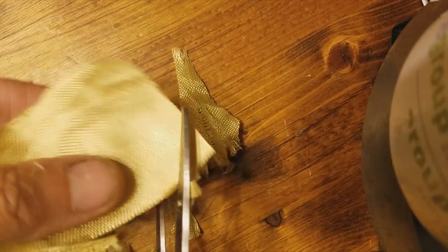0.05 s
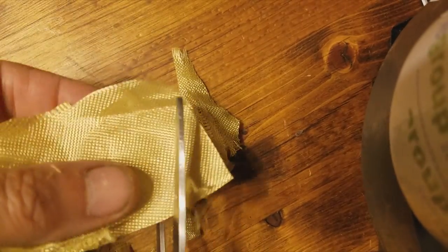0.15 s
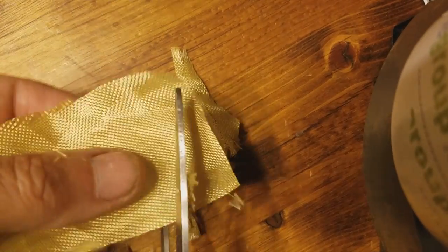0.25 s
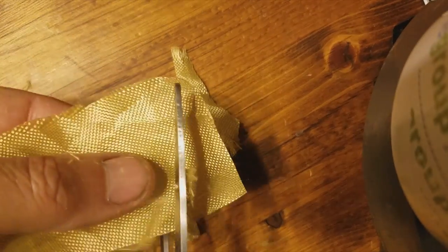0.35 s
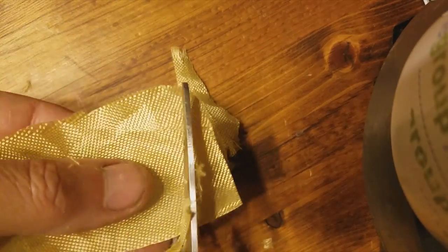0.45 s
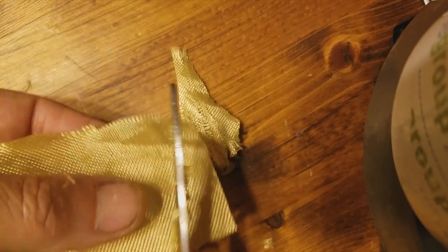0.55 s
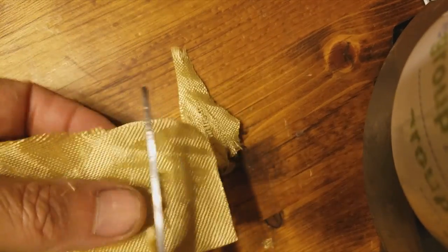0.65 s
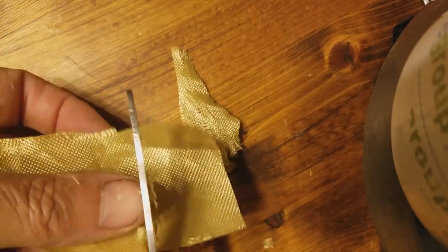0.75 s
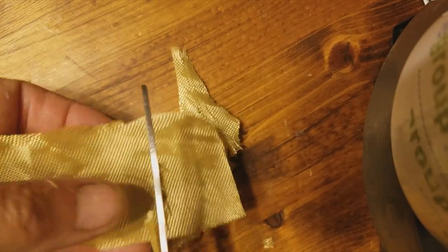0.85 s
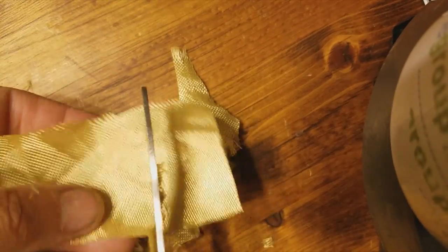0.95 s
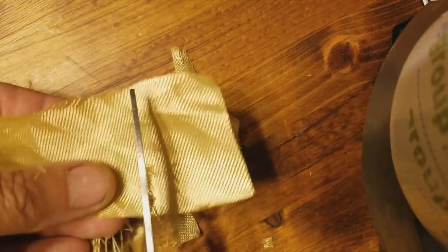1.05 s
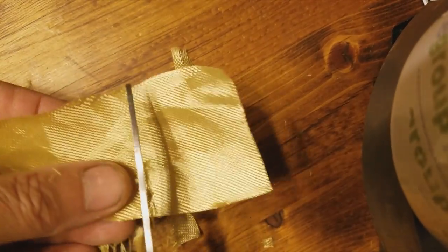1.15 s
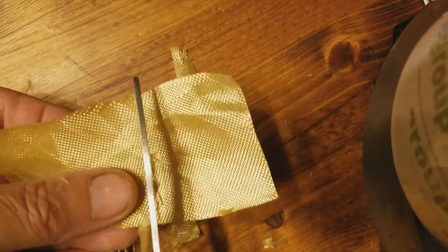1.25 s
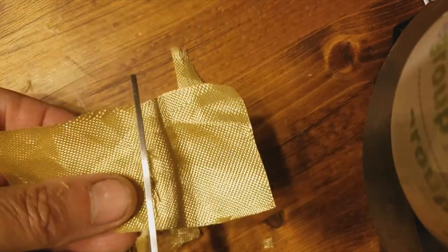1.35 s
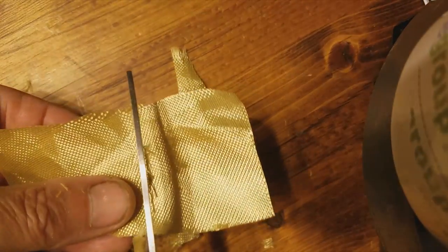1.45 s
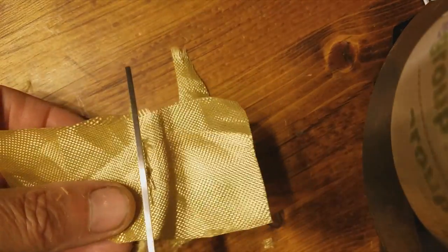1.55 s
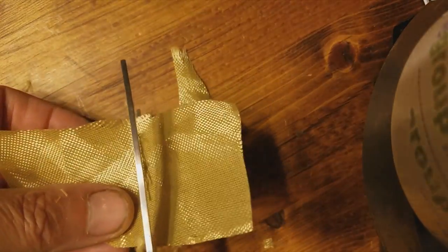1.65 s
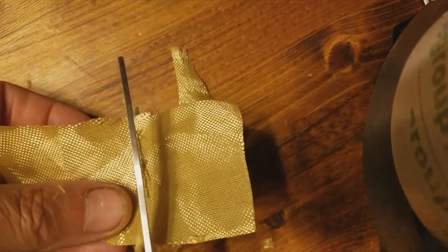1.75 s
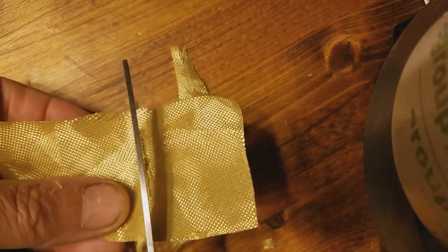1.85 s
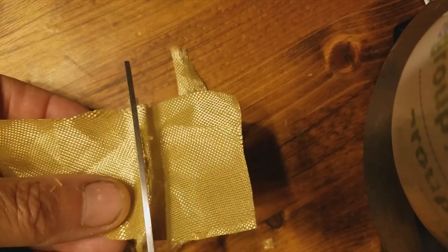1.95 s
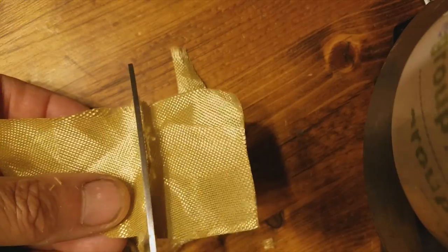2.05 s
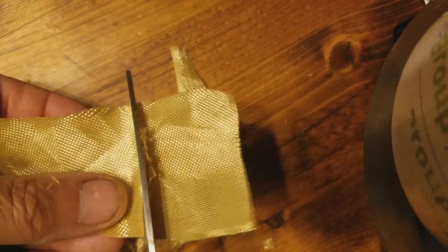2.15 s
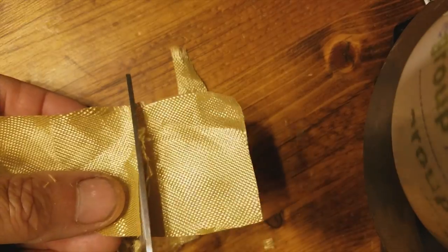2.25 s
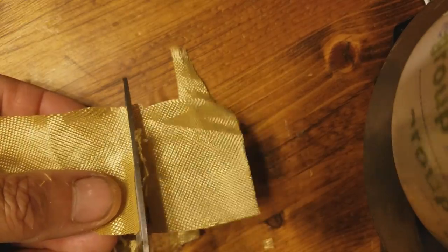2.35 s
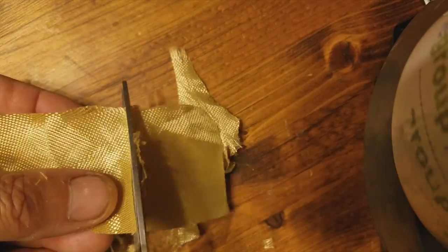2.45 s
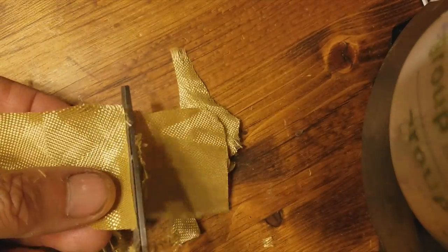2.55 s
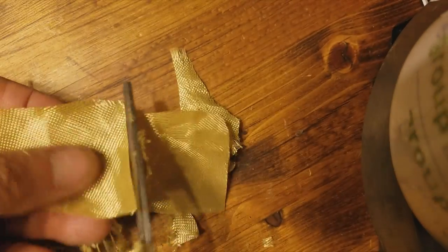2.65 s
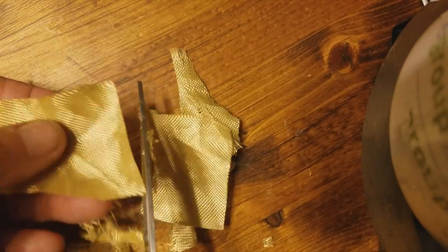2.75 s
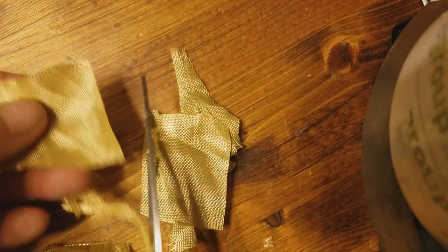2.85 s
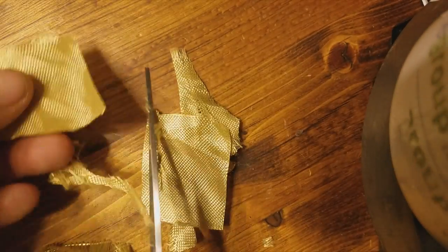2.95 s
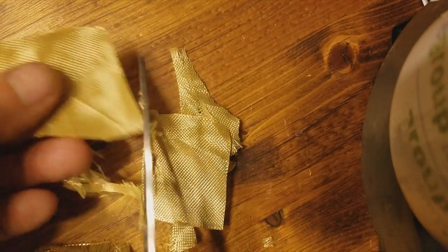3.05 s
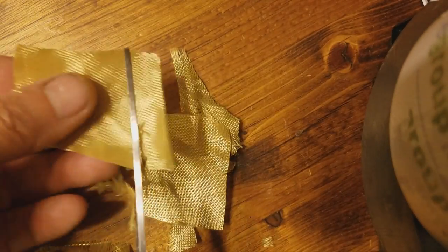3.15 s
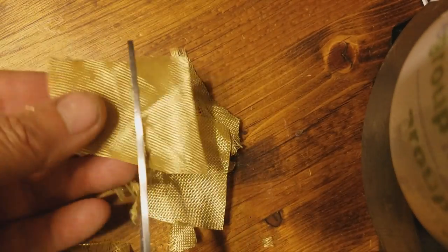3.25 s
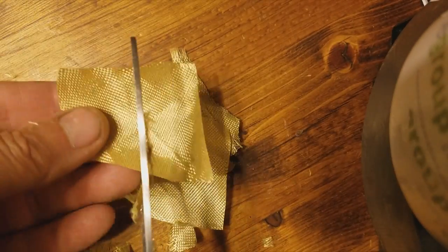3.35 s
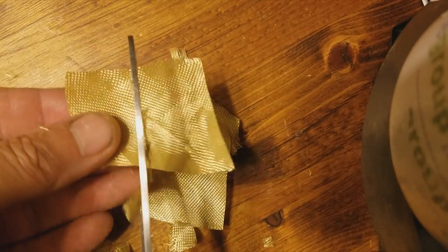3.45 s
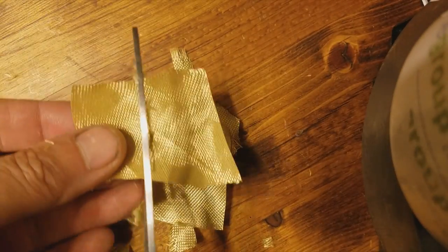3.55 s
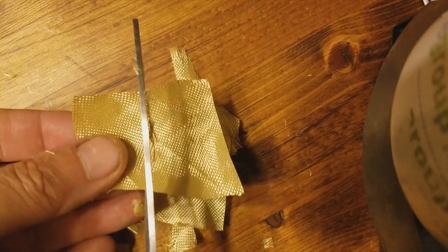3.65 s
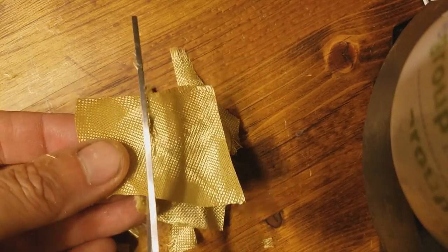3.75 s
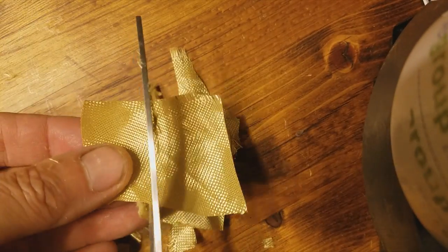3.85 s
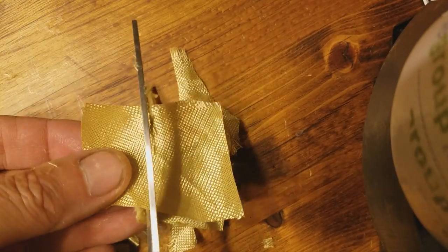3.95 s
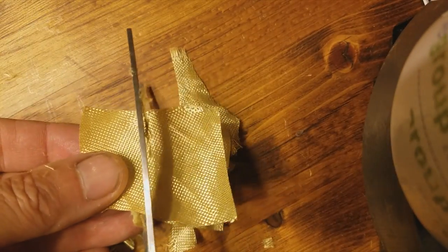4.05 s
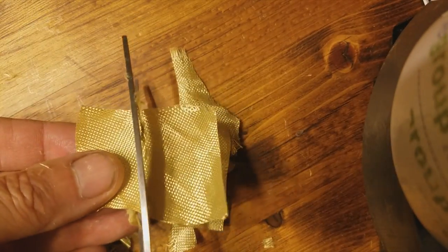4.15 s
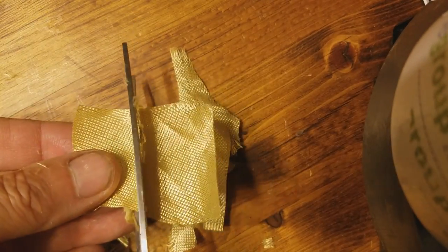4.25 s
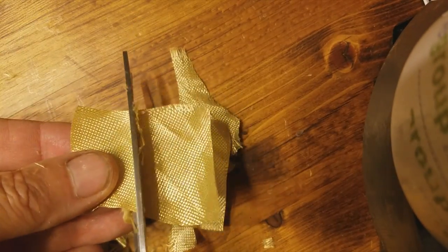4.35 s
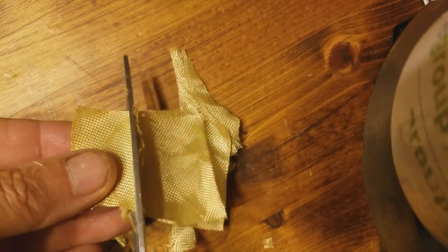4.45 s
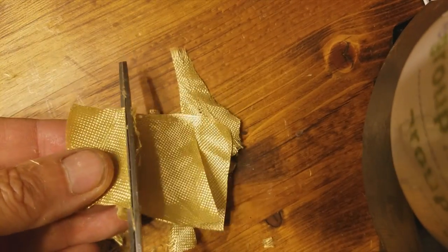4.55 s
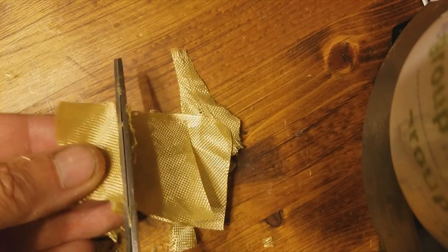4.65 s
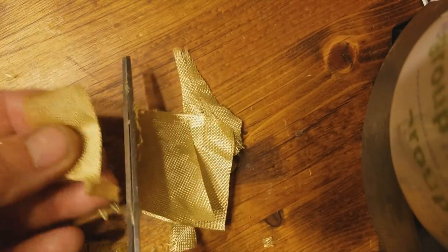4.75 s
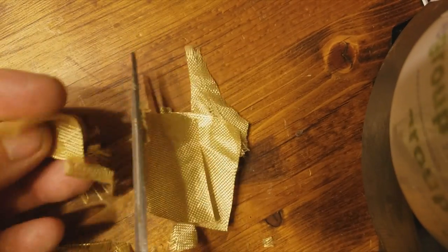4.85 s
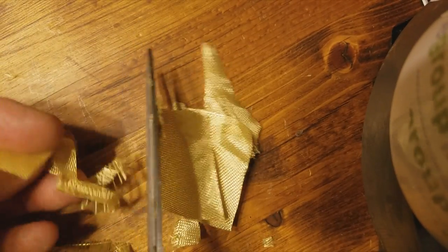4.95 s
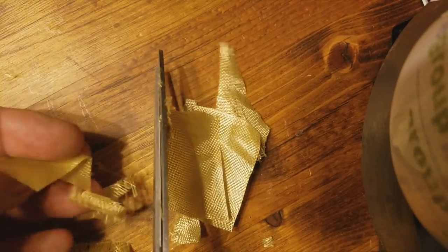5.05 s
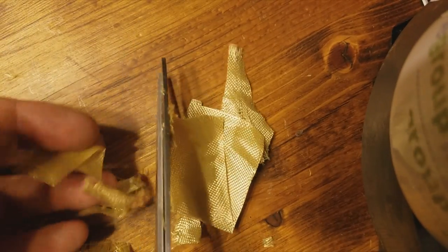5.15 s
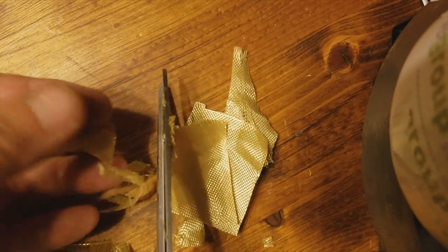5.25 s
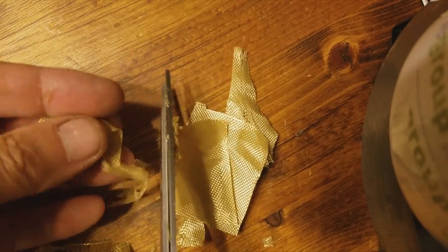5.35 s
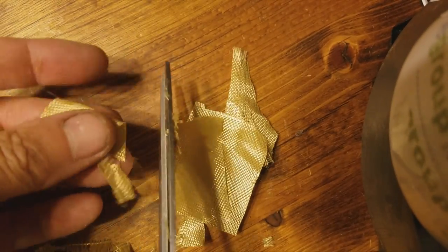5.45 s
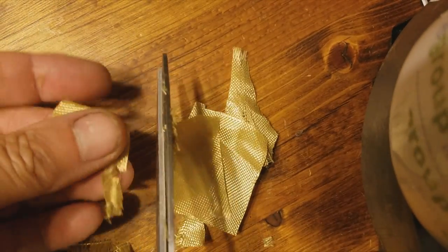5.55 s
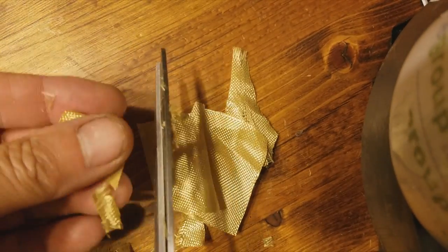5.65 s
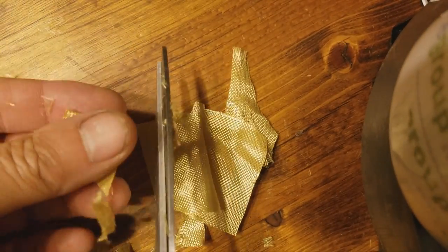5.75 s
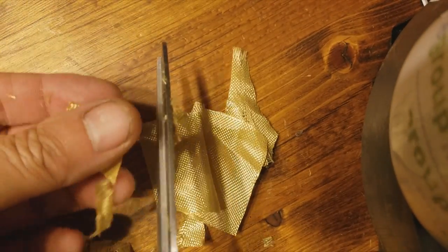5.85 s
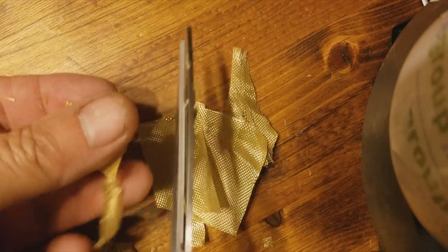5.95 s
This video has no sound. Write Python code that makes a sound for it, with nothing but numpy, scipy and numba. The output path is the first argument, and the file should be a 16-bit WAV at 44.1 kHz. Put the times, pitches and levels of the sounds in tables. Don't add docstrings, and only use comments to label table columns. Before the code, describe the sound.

Serrated scissors crunch slowly through stiff woven cloth in two ratcheting cuts, each ending in a sharp snap and a metallic click on reopening.

```python
import sys
import numpy as np
from scipy import signal
from scipy.fft import rfft, irfft
from scipy.io import wavfile
from scipy.ndimage import uniform_filter1d
from numba import njit

SR = 44100
rng = np.random.default_rng(int(sys.argv[2]) if len(sys.argv) > 2 else 0)


def wav_out(sig):
    wavfile.write(sys.argv[1], SR, np.round(np.clip(np.atleast_2d(sig).T, -1, 1) * 32767).astype(np.int16))


def gain_from_db(level_db):
    decades = np.asarray(level_db, float) / 20
    return 10 ** decades


N = 264820

# f/Hz, density/dB
ROOM_SPECTRUM = [(28, -6.5), (370, -10.5), (520, -15), (2600, -21), (7600, -30.5), (8870, -33),
                 (13700, -27.5), (16000, -30)]
# f/Hz, width/Hz, level/dB
HUM_MODES = [(106, 30, -71.5)]
# t/s, peak/dB, first f/Hz, last f/Hz, t60/s
TABLE_BLOWS = [(.005, -38.5, 550, 118, 0.076), (0.023, -50, 910, 200, 0.014), (.044, -48, 915, 300, 0.0092),
               (.048, -47.5, 690, 200, 0.018), (0.1158, -38, 540, 122, 0.065),
               (0.133, -49, 880, 201, 0.033), (0.224, -53.5, 510, 150, 0.084),
               (0.362, -42, 544, 114, 0.081), (.391, -51, 910, 306, 0.024), (.583, -47, 400, 131, 0.073),
               (0.647, -52.5, 594, 200, 0.082), (0.991, -55, 300, 110, 0.054),
               (2.487, -40, 231, 156, 0.054), (2.734, -59, 1090, 600, 0.015), (4.8, -45, 1080, 600, 0.023),
               (4.512, -40.5, 350, 86, 0.053)]
# t/s, peak/dB, f/Hz
FIBRE_TICKS = [(0.044, -50, 2120), (0.06, -44, 3600), (0.0694, -45, 2630), (0.392, -38.5, 7650),
               (0.6496, -39, 6840), (0.9333, -41, 7460), (1.4154, -55, 6900), (1.439, -59, 2120),
               (1.5274, -39, 2200), (1.5664, -53, 2960), (1.6084, -35, 3040), (1.6283, -33.5, 2400),
               (3.7494, -75, 2770), (5.114, -40, 5880), (5.1258, -36.5, 2810), (5.9506, -39, 7150)]
# middle t/s, length/s, level/dB, treble/dB
CLOTH_SWELLS = [(0.018, 0.24, -62, -5), (0.264, 0.072, -67.5, 0), (.345, .04, -72, 2),
                (0.527, 0.041, -68, -3.5), (.77, .36, -70.5, -3.5), (0.966, 0.022, -65, -11),
                (1.014, 0.1, -64.5, 2), (1.43, 0.053, -63.5, -8), (1.47, 0.026, -54, -8),
                (1.526, 0.088, -56, -6), (1.599, 0.11, -58.5, -1.5), (1.84, 0.051, -62.5, -5),
                (2.678, 0.17, -65.5, -1), (2.96, .2, -65.5, 0), (3.16, 0.29, -65.5, -1.5),
                (3.43, 0.15, -70.5, 0), (3.746, 0.028, -63.5, -1.5), (3.81, 0.094, -65.5, -5),
                (4.06, 0.045, -69, -6), (4.652, 0.056, -67.5, -2.5), (4.746, 0.12, -67.5, -5),
                (4.856, 0.15, -66, 0.5), (5.006, 0.087, -71.5, 7.5), (5.135, 0.041, -68.5, 8.5),
                (5.253, 0.31, -73, 2), (5.399, 0.034, -62, -0.5), (5.508, .12, -68, 2.5),
                (5.66, 0.2, -74, 5.5)]
# middle t/s, length/s, level/dB, treble/dB
GRIND_SWELLS = [(1.98, .16, -71, 5), (2.25, 0.48, -63, -3), (2.51, 0.047, -58, -6.5),
                (2.77, 0.058, -59, -5), (4.161, 0.072, -60.5, 4), (4.32, 0.23, -65.5, 1.5),
                (4.53, 0.099, -58.5, -9), (4.81, .06, -58.5, -9)]
# f/Hz, width/Hz, level/dB
WEAVE_MODES = [(7450, 1150, 3.5), (5730, 4200, -4), (11070, 3300, -0.5), (14300, 4700, -2.5)]
# t/s, level/dB
HAND_EFFORT = [
    [(1.93, -70), (2.018, -60), (2.168, -62.5), (2.246, -55), (2.414, -70.5), (2.49, -54), (2.56, -81)],
    [(4.09, -78), (4.214, -60.5), (4.306, -70.5), (4.382, -57), (4.478, -67), (4.516, -61), (4.58, -83)],
]
# f/Hz, width/Hz, level/dB
BLADE_MODES = [(3860, 670, 4), (5660, 870, -18), (7000, 820, 7), (6100, 9000, -4.5)]
# f/Hz, width/Hz, level/dB
FIBRE_MODES = [(10000, 1500, 4.5), (12200, 1700, 5), (13470, 2400, 3), (14950, 1500, 3)]
# f/Hz, level/dB, t60/s
STEEL_MODES = [(3320, 0, .03), (5740, -6, .025), (7000, -9, .025)]
# t/s, length/ms, force level/dB, steel over cloth/dB
FIRST_YARNS = [(1.921, 12.4, -62, 3.5), (1.946, 3.9, -52, -4), (1.953, 5.1, -52, 1), (1.955, 18, -70.5, 12),
               (1.995, 17.4, -52.5, 5), (2.024, 11.2, -45, -2), (2.034, 12, -60.5, 8),
               (2.063, 14, -45.5, -3), (2.091, 9.6, -45.5, -2), (2.107, 5.3, -54, 7.5),
               (2.144, 2.9, -71, 5), (2.155, 10.2, -39, -4), (2.187, 13.9, -40.5, -10),
               (2.215, 4.4, -70, 14), (2.232, 13.6, -41, -4), (2.256, 10.4, -37, -6.5),
               (2.289, 10.8, -38, -3), (2.328, 4.1, -58, 3), (2.345, 9.9, -32.5, -8), (2.37, 5.2, -40, -6),
               (2.384, 2.9, -48, -3), (2.389, 4.5, -41.5, -2), (2.424, 2.8, -44, -6), (2.43, 13, -32, -4.5),
               (2.463, 6, -39, -2.5), (2.476, 2.5, -57, 14)]
# t/s, length/ms, force level/dB, steel over cloth/dB
SECOND_YARNS = [(4.109, 12, -58.5, -4), (4.121, 9.2, -58, -7), (4.129, 10, -64, 6), (4.149, 18, -58, -2),
                (4.167, 5.4, -45.5, -8), (4.174, 10, -59, 9), (4.195, 20.3, -48.5, 2.5),
                (4.22, 17.8, -47, 0), (4.256, 17, -46.5, -0.5), (4.287, 10.3, -50, 3),
                (4.313, 16.6, -41, -4), (4.342, 16, -41, -4), (4.367, 16, -42.5, -0.5),
                (4.389, 10.5, -38.5, -5), (4.413, 7.7, -55, 7), (4.419, 8, -37, -4.5), (4.44, 3.7, -54, 0),
                (4.453, 10.5, -37.5, -0.5), (4.489, 4.2, -37, -2)]
CUT_LEANS = (2, 4.5)
# t/s, length/ms, force level/dB, steel over cloth/dB, fibre over blade/dB
BLADE_SHUTS = [(2.481, 3.4, -30, -3.5, -13), (2.486, 5.7, -33.5, 7.5, -3), (2.493, 1.9, -26.5, 2.5, 2.5),
               (2.496, 16, -52, -6, 1), (4.513, 4.3, -44, 2, -15), (4.514, 9.9, -35.5, 7.5, -3),
               (4.528, 25, -52.5, 1.5, -2)]
# t/s, length/ms, force level/dB, steel over cloth/dB, fibre over blade/dB
BLADE_OPENS = [(2.726, 10, -38, 1.5, -2), (2.7327, 2.83, -28, 5.5, -8), (2.7363, 2.5, -31, 4, -11.5),
               (2.74, 3, -31, -1, -9.5), (2.745, 8.6, -45, -11, -4), (2.76, 15, -62, -3, 1),
               (2.773, 18, -56, -5.5, -2), (4.791, 4.1, -51, -3, 0), (4.795, 10, -41, 15, -6),
               (4.801, 2, -44, 7, 0), (4.805, 3.5, -27, -4, -7), (4.811, 3.3, -43, -10, 4)]
# t/s, f/Hz
SPAN_PITCH = [
    [(1.92, 1900), (2.0, 1940), (2.065, 1140), (2.19, 1060), (2.33, 1520), (2.39, 1750), (2.43, 2500),
     (2.486, 2900), (2.5, 2170)],
    [(2.728, 2840), (2.74, 2760), (2.76, 1500), (2.8, 1500)],
    [(4.11, 950), (4.2, 1490), (4.26, 1300), (4.39, 1250), (4.42, 1830), (4.49, 1700), (4.514, 2940),
     (4.53, 2580)],
    [(4.79, 2200), (4.804, 3200), (4.812, 1530)],
]
# start t/s, end t/s, first f/Hz, last f/Hz, share level/dB
TIP_GLIDES = [(1.937, 2.04, 7000, 7600, 0.5), (2.05, 2.157, 8400, 11500, -3),
              (2.17, 2.253, 11400, 14300, 6.5), (2.245, 2.29, 14300, 15400, -2),
              (2.758, 2.786, 15100, 10600, 0), (4.1, 4.188, 15500, 13200, 3),
              (4.188, 4.24, 7100, 7750, -0.5), (4.246, 4.304, 8550, 10100, -5),
              (4.31, 4.405, 10100, 15500, -0.5), (1.94, 2.05, 9000, 8800, -7),
              (4.118, 4.18, 8900, 8900, -6), (4.323, 4.42, 10100, 10300, -2)]


def unit(x):
    return x / np.sqrt(np.mean(x ** 2))


@njit
def svf(x, hz, width):
    y, b, l = np.empty(len(x)), 0., 0.
    for i in range(len(x)):
        g, k = np.tan(np.pi * hz[i] / SR), width / hz[i]
        v = (b + g * (x[i] - l)) / (1 + g * (g + k))
        b, l, y[i] = 2 * v - b, l + 2 * g * v, k * v
    return y


def body(x, modes):
    out = np.zeros(N)
    for k, (hz, width, db) in enumerate(modes):
        out += (-1) ** k * gain_from_db(db) * svf(x, np.full(N, 1. * hz), 1. * width)
    return out


def band(x, lo_hz, hi_hz, order=2):
    return signal.sosfilt(signal.butter(order, [lo_hz, hi_hz], "band", fs=SR, output="sos"), x)


def held(t, start, end, fade_s):
    return np.clip(1 + np.minimum(t - start, end - t) / fade_s, 0, 1)


def walk(rate):
    k = int(SR / rate)
    return uniform_filter1d(np.repeat(rng.standard_normal(N // k + 1), k), k)[:N]


def snaps(per_s, spread_db):
    hit = rng.random(N) < per_s / SR
    loudness = gain_from_db(spread_db * np.minimum(rng.exponential(size=N), 4))
    return unit(hit * rng.standard_normal(N) * loudness)


def voices(excite, cloth_hz, cloth_width, blade_modes, fibre_modes):
    def cloth(x):
        return band(svf(x, cloth_hz, cloth_width) + 0.27 * x, 590, 3130)

    def blade(x):
        return band(body(x, blade_modes), 2840, 8300)

    def fibre(x):
        return band(body(x, fibre_modes), 12100, 18900)

    return [lambda x, f=f: f(x) / np.sqrt(np.mean(f(excite) ** 2)) for f in (cloth, blade, fibre)]


def room_tone():
    hz, db = np.transpose(ROOM_SPECTRUM)
    f = np.maximum(np.arange(N // 2 + 1) * SR / N, 1)
    colour = gain_from_db(np.interp(np.log(f), np.log(hz), db))
    air = unit(irfft(rfft(rng.standard_normal(N)) * colour, N))
    hum = sum(gain_from_db(db) * unit(body(rng.standard_normal(N), [(hz, width, 0)])) for hz, width, db in HUM_MODES)
    whine_hz = 743 + 2 * walk(3)
    whine = np.sqrt(2) * np.sin(2 * np.pi * np.cumsum(whine_hz) / SR)
    return gain_from_db(-62.5 + 0.3 * walk(4.5)) * air + hum + gain_from_db(-77) * whine


def thuds():
    out, t = np.zeros(N + 8192), np.arange(8192) / SR
    for s, db, first_hz, last_hz, t60 in TABLE_BLOWS:
        hz = last_hz + (first_hz - last_hz) * np.exp(-t / 0.0028)
        phase = 2 * np.pi * np.cumsum(hz) / SR
        decay = gain_from_db(db - 60 * t / t60) * (1 + 0.81 * np.exp(-t / 0.00033))
        start = int(s * SR)
        out[start:start + 8192] -= decay * np.sin(phase + 0.33 * np.sin(phase))
    return out[:N]


def ticks():
    out, t = np.zeros(N + 512), np.arange(512) / SR
    for s, db, hz in FIBRE_TICKS:
        tone = np.sin(2 * np.pi * hz * t) * np.exp(-t / .0002)
        noise = .5 * rng.standard_normal(512) * np.exp(-t / .0006)
        start = int(s * SR)
        out[start:start + 512] += gain_from_db(db - 3) * (tone + noise)
    return out[:N] - svf(out[:N], np.full(N, 9200.), 2500.)


def rustle():
    t, power = np.arange(N) / SR, np.zeros((3, N))
    skirt_db, skirt_power = 6.5, 1.9
    for s, length, db, treble_db in CLOTH_SWELLS + GRIND_SWELLS:
        skirt = skirt_db * np.abs(2 * (t - s) / length) ** skirt_power
        swell = gain_from_db(db - np.minimum(skirt, 200))
        tilt = gain_from_db(np.array([[0], [treble_db - 2], [treble_db]]))
        power += (tilt * swell) ** 2
    fine = snaps(7000, 1.6) * gain_from_db(1.15 * walk(45) + 2.0 * walk(200))
    parts = voices(fine, np.full(N, 1550.), 1200.0, WEAVE_MODES[:2], WEAVE_MODES[2:])
    mix = sum(f(fine) * np.sqrt(p) * gain_from_db(1.3 * walk(25)) for f, p in zip(parts, power))
    return band(mix, 680, 20000)


def table(t, force):
    bite = force / uniform_filter1d(force + 1e-4, 3000) + 0.89
    knock = unit(band(bite * rng.standard_normal(N), 218, 484))
    rumble = unit(band(rng.standard_normal(N), 54.4, 148))
    out = np.zeros(N)
    for s, db in map(np.transpose, HAND_EFFORT):
        effort = np.interp(t, s, db)
        sway = gain_from_db(-61.5 + 0.26 * (effort - db.max()))
        out += held(t, s[0], s[-1], .03) * (gain_from_db(effort) * knock + sway * rumble)
    return out


def glide(drive, start, end, first_hz, last_hz, db):
    t = np.arange(N) / SR
    share = gain_from_db(db + 10.5 + 2 * walk(250)) * held(t, start, end, .01)
    hz = np.exp(np.interp(t, [start, end], np.log([first_hz, last_hz])))
    return svf(drive * share + 1e-18, np.clip(hz, 1000, 18000), last_hz / 25)


def steel_ring(x):
    out = np.zeros(N)
    for hz, db, t60 in STEEL_MODES:
        pole = np.exp(2j * np.pi * hz / SR - np.log(1000) / (t60 * SR))
        out += gain_from_db(db) * signal.lfilter([1], [1, -pole], x).imag
    return out


def cutting():
    t = np.arange(N) / SR
    cuts = [np.c_[rows, np.full(len(rows), lean)] for rows, lean in zip((FIRST_YARNS, SECOND_YARNS), CUT_LEANS)]
    bites = np.concatenate(cuts + [BLADE_SHUTS, BLADE_OPENS])
    s, ms, db, steel_db, lean_db = bites[np.argsort(bites[:, 0])].T
    levels = np.array([db, db + steel_db - lean_db / 2, db + steel_db + lean_db / 2])
    fibres = snaps(14000, 0.43)
    evened = fibres / np.sqrt(uniform_filter1d(fibres ** 2, 200))
    fibres = unit(evened * gain_from_db(1.2 * walk(700)))
    force = np.zeros((3, N))
    for k in range(len(s)):
        rise = np.clip((t - s[k]) / .003 + .6, 0, 1)
        fall = np.clip((s[k] + ms[k] / 1000 - t) / 0.0043 + 0.38, 0, 1)
        creak = .16 * np.exp(-np.abs(t - s[k]) / .003)
        force += gain_from_db(levels[:, k:k + 1]) * ((rise * fall) ** 2 + creak)
    now = np.maximum(np.searchsorted(s - .002, t) - 1, 0)
    opening = np.isin(s, np.transpose(BLADE_OPENS)[0])[now]
    progress = np.clip((t - s[now]) / ms[now] * 1000, 0, 1) - .5
    tension = 0.54 * np.where(opening, -progress, progress)
    span_hz = np.interp(s, *np.concatenate(SPAN_PITCH).T)
    cloth_hz = np.clip(span_hz[now] * np.exp(tension), 300, 6000)
    parts = voices(fibres, cloth_hz, 710.0, BLADE_MODES, FIBRE_MODES)
    cloth, blade, fibre = (f(fibres * g) for f, g in zip(parts, force))
    drive = fibres * (force[1] + force[2] + gain_from_db(-64))
    tip = sum(glide(drive, *row) for row in TIP_GLIDES)
    ring = gain_from_db(-65) * steel_ring(fibres * force[1])
    return cloth + blade + fibre + tip + ring + table(t, force[0])


def scene():
    near = cutting() + rustle() + thuds() + ticks()
    t = np.arange(SR // 4) / SR
    decay = gain_from_db(-39.5 - 60 * t / 0.053) + gain_from_db(-56.5 - 60 * t / 0.3)
    echo = rng.standard_normal(len(t)) * decay * (t > .001)
    return (near + signal.fftconvolve(near, echo)[:N] + room_tone())[None]


def roll_off(x):
    return signal.sosfilt(signal.butter(12, 16620, fs=SR, output="sos"), x)


def record(dry):
    low_pass = signal.ellip(8, .2, 50, 15950, fs=SR, output="sos")
    mix = signal.sosfilt(low_pass, dry)
    return roll_off(mix)


dry = scene()
out = record(dry)
wav_out(out)
```